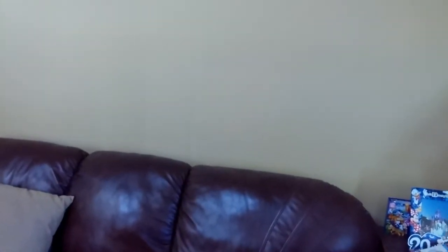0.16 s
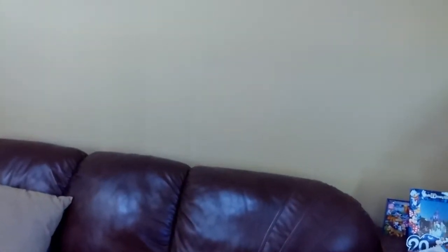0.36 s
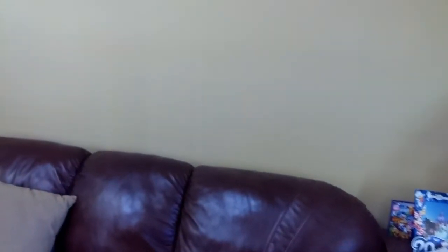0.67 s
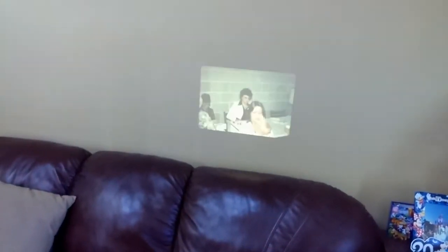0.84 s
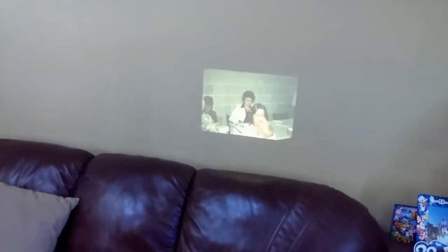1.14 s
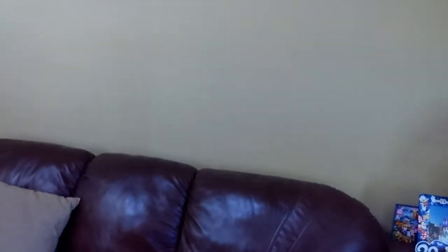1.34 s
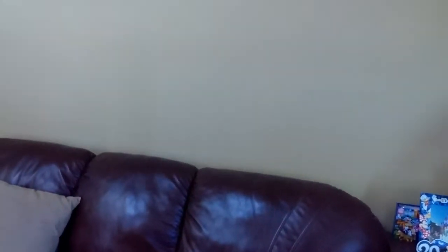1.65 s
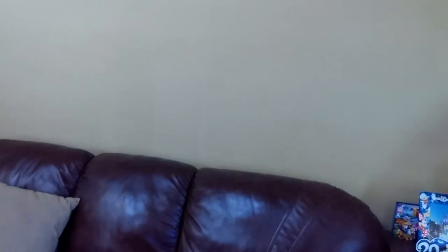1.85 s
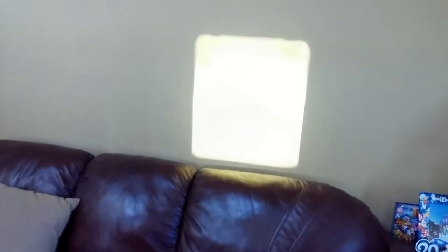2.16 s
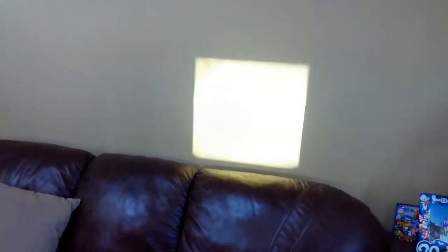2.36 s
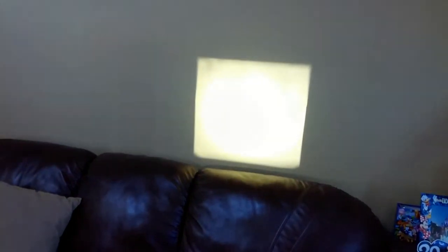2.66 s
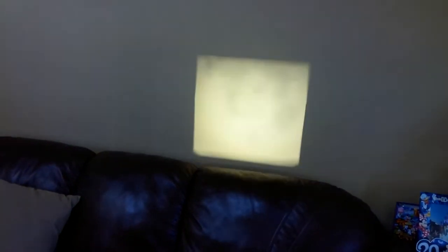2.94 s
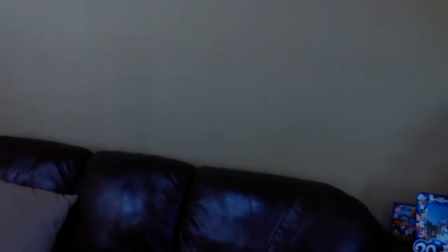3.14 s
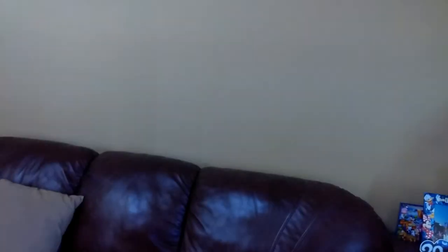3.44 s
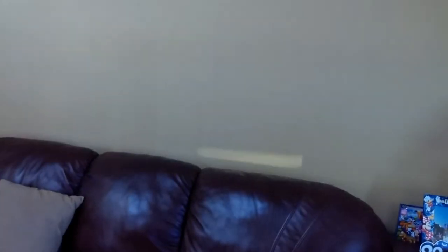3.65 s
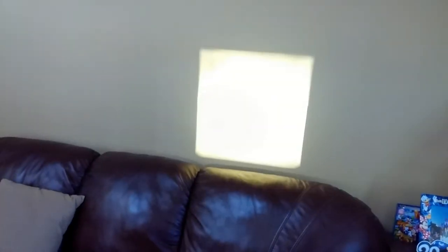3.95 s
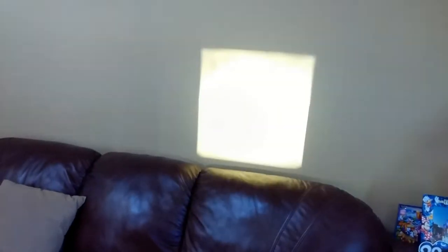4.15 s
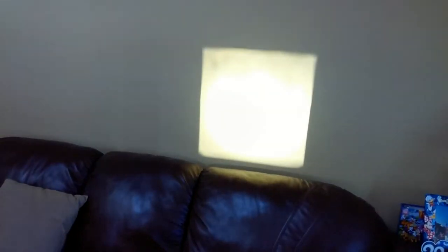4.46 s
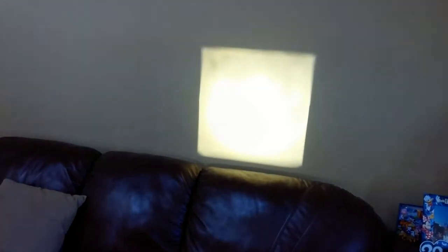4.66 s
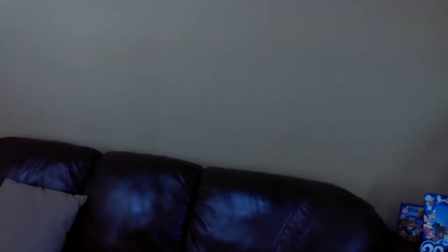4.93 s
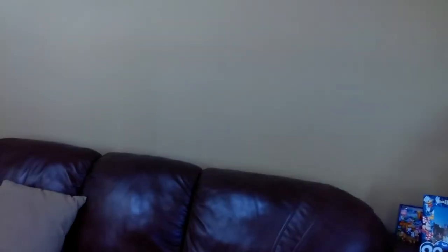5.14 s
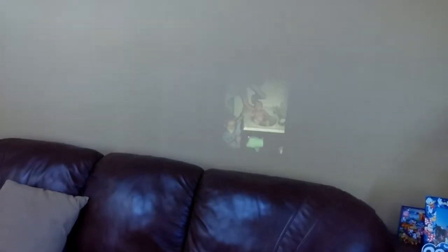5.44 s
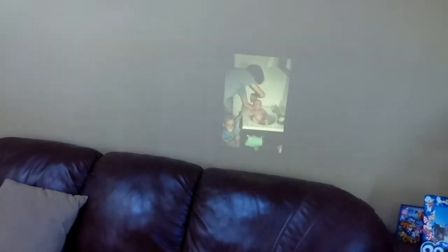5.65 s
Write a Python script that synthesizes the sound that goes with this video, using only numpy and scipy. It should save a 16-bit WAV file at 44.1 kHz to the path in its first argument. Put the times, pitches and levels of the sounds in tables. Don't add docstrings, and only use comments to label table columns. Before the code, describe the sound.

Close, loud mechanical snaps and clatters of a slide changer, four cycles, with fan air, soft buzz and quick faint belt ticking between.

```python
import sys
import numpy as np
from scipy import signal
from scipy.fft import rfft, irfft
from scipy.io import wavfile
from scipy.ndimage import uniform_filter1d

SR = 44100
rng = np.random.default_rng(int(sys.argv[2]) if len(sys.argv) > 2 else 0)


def dump_mix(stems):
    frames = np.atleast_2d(stems).T
    limited = np.clip(frames, -1, 1)
    pcm = np.round(limited * 32767).astype(np.int16)
    wavfile.write(sys.argv[1], SR, pcm)


def gain_from_db(level_db):
    decades = np.asarray(level_db, float) / 20
    return 10 ** decades


N = 255780

# (t/s after the trip, level/dB, struck part f/Hz, contact)
CAM_BLOWS = [(0, 1, 2180, "snap"), (.047, -19, 1580, "scrape"), (.1075, -17.5, 2020, "scrape"),
             (.1235, -17, 1665, "tick"), (.143, -7.5, 1400, "clack"), (.153, -14.5, 1560, "tick"),
             (.304, -23.5, 1380, "scrape"), (.354, -16.5, 1420, "tick"), (.365, -13.5, 1450, "snap"),
             (.611, -22, 2860, "clack"), (.622, -17, 2900, "thunk")]
# (t/s, level/dB, struck part f/Hz, contact)
RISE = [(.051, -28.5, 2900, "snap"), (0.059, -25.5, 2900, "tick"), (0.0654, -2.5, 1830, "snap"),
        (0.077, 6, 2730, "snap"), (.089, -12, 1410, "clack"), (.104, -19, 1660, "snap"),
        (0.1213, -12, 1430, "snap"), (0.228, -20, 1650, "scrape"), (.244, -22, 1790, "snap"),
        (0.256, -19, 2900, "snap"), (0.272, -1, 1930, "snap"), (.284, -5.5, 1604, "clack"),
        (.2947, -15, 1580, "clack"), (.321, -20, 2550, "tick"), (1.357, -28, 2900, "snap"),
        (1.3645, -20.5, 1690, "tick"), (1.3709, 2, 3300, "slam"), (1.379, -3, 1910, "clack"),
        (1.3908, -0.5, 1910, "snap"), (1.3994, -25, 1210, "clack"), (1.4422, -9.5, 1260, "snap"),
        (1.507, -22, 2250, "scrape"), (1.539, -25, 2770, "scrape"), (1.558, -16.5, 2860, "clack"),
        (1.589, -4.5, 1790, "clack"), (1.596, -9, 2150, "scrape"), (1.613, -13, 1570, "tick"),
        (1.6426, -19, 2440, "tick"), (1.672, -23, 2660, "clack"),
        (2.987, -33, 2900, "snap"), (2.9951, -19, 1720, "tick"), (2.9984, -8.5, 1960, "clack"),
              (3.0103, 3.5, 2970, "slam"), (3.0247, -21, 2930, "clack"), (3.047, -21, 1360, "scrape"),
              (3.067, -29, 1280, "scrape"), (3.1728, -17, 1630, "snap"), (3.1852, -24.5, 2920, "tick"),
              (3.218, -20.5, 1460, "thunk"), (3.241, -20, 2000, "thunk"), (3.25, -18, 2550, "tick"),
              (3.2635, -17.5, 2530, "clack"), (3.273, 0, 2800, "snap"), (3.2933, -11.5, 2670, "clack"),
        (4.76, -16.5, 1850, "clack"), (4.767, -5.5, 1780, "clack"), (4.7762, -0.5, 1290, "snap"),
               (4.7832, 1, 1450, "snap"), (4.8, -31, 1480, "clack"), (4.832, -20, 1580, "clack"),
               (4.8471, 0, 2170, "snap"), (4.853, -2, 1820, "snap"), (4.8675, -9, 1340, "clack"),
               (4.948, -24.5, 2800, "scrape"), (4.962, -21, 2940, "clack"), (4.999, -20, 1460, "thunk"),
               (5.0174, -22, 1200, "clack"), (5.027, -18, 2570, "tick"), (5.0392, -22, 2520, "tick"),
               (5.069, -25.5, 2660, "tick")]
# (t/s, level/dB, struck part f/Hz, contact)
DROP = [(.6335, -23, 1480, "thunk"), (0.7624, -6.5, 2300, "clack"), (.7894, -39, 2250, "clack"),
        (.8003, -37, 2260, "clack"), (0.819, -6.5, 2360, "snap"), (0.853, -16.5, 3100, "clack"),
        (0.866, -15.5, 1640, "clack"), (.8752, -31, 1650, "clack"), (2.1305, 1.5, 2610, "slam"),
        (2.1494, -14, 1560, "snap"), (2.167, -6, 1740, "snap"), (2.19, -17.5, 1490, "clack"),
        (3.331, -3.5, 2240, "snap"), (3.343, -25, 1420, "clack"), (3.383, -29, 2170, "clack"),
        (3.7528, 0, 2790, "slam"), (3.769, -11.5, 1370, "clack"), (3.7893, -12.5, 1450, "scrape"),
        (5.406, -17.5, 1760, "tick"), (5.446, -28, 2240, "tick"), (5.4716, -10.5, 1420, "slam"),
        (5.2475, -15, 1200, "clack"), (5.5225, -9, 1620, "clack"), (5.5347, -21, 1870, "clack"),
        (5.5571, -12, 2900, "clack"), (5.566, -5.5, 1900, "snap"), (5.586, -17.5, 1330, "clack")]
CONTACTS = {"snap": (-36.5, -23, 0.028), "clack": (-25, -17, 0.045), "tick": (-28.5, -9.5, 0.031),
            "thunk": (-10.5, -13, 0.016), "scrape": (-43, -25, 0.074), "slam": (-43, -27, 0.035)}
# (t/s after the trip, level/dB)
SLIDING = [
    (-.34, -37),
    (-.28, -30),
    (-.165, -30),
    (-.09, -38.5),
    (.03, -32.5),
    (.16, -32),
    (.3, -34),
    (.55, -33.5),
    (.7, -37),
]
# (f/Hz, level/dB)
CRACK = [(500, -31), (1000, -15), (2000, -16.5), (3200, 1.5), (4200, -4.5), (6000, -0.5), (9000, -1),
         (11000, 1.5), (12000, 2.5), (13500, -1.5), (16000, -3.5)]
# (f/Hz, level/dB, t60/s)
CASE = [(347, -30, 0.02), (441.3, 0, 0.079), (460, 3.5, 0.052), (571, 1, 0.033), (691, 2, 0.062),
        (829.5, 2.5, 0.11)]
# (f/Hz, level/dB, t60/s)
TRAY = [(996.5, -2.5, 0.047), (1200, 3, 0.017), (1400, 0.5, 0.022), (1536, 2.5, 0.03), (1800, 4.5, 0.013),
        (2006, 4, 0.014), (2272, 2, 0.016), (2570, 0, 0.01), (2900, -1.5, 0.029), (2880, -17.5, 0.013)]


def changer():
    contacts = rng.standard_normal(N) * gain_from_db(3.22 * np.minimum(rng.exponential(size=N), 4.5))
    contacts = contacts * gain_from_db(3.1 * walk(700))
    contacts = contacts / contacts.std()
    t = np.arange(SR // 5) / SR
    crack, case, tray, part = np.zeros((4, N))
    blows = every_turn(CAM_BLOWS, column=1) + RISE + DROP
    for s, db, hz, contact in blows:
        case_db, tray_db, length = CONTACTS[contact]
        length = length * gain_from_db(0.18 * (db + 2.0))
        decay = np.exp(-np.log(1000) * (t / max(length, .004)) ** 1.4)
        swarm = (1 - np.exp(-t / 0.0011)) * decay
        add(crack, s, gain_from_db(db - 9.0) * swarm)
        add(case, s, gain_from_db(db + case_db - 22.0) * swarm)
        add(tray, s, gain_from_db(db + tray_db - 22.0) * swarm)
        start = int(s * SR)
        rattle = swarm * np.resize(contacts[start:start + len(t)], len(t))
        add(part, s, ring(gain_from_db(db + tray_db - 16) * rattle, [(hz, 2, .016)]))

    time = np.arange(N) / SR
    after, rub_db = np.transpose(SLIDING)
    rub = sum(np.interp(time, trip + after, gain_from_db(rub_db - 17.5), left=0, right=0) for trip, _, _ in CHANGES)
    rub = rub * gain_from_db(0.85 * walk(55))
    cracks = colour((crack + rub) * contacts, CRACK)
    case_ring = ring((case + gain_from_db(-31.0) * rub) * contacts, CASE)
    tray_ring = ring((tray + gain_from_db(-22.0) * rub) * contacts, TRAY)
    return cracks + case_ring + tray_ring + part


# (t/s, slowness of the cam as a ratio, level/dB)
CHANGES = [
    (.3998, 1.002, 0),
    (1.7073, 1.001, -.5),
    (3.3285, .997, 0),
    (5.1043, .996, -.5),
]


def every_turn(steps, column):
    return [(trip + slow * row[0], *row[1:column], row[column] + db, *row[column + 1:])
            for trip, slow, db in CHANGES for row in steps]


# (t/s after the trip, f/Hz, level/dB, t60/s)
CAM_KNOCKS = [
    (.156, 470, -34, 0.14),
    (.6235, 3150, -24, .018),
    (.6232, 510, -23, 0.065),
]
# (t/s, f/Hz, level/dB, t60/s)
KNOCKS = [(.29, 440, -32.5, 0.32), (.33, 2570, -27, 0.082), (.708, 9660, -35, 0.12),
          (2.014, 9640, -33, 0.073), (3.634, 9700, -34, 0.054), (.757, 1500, -21.5, 0.048),
          (.762, 2272, -9.5, 0.096), (.89, 768, -32.5, 0.18), (.92, 764, -44, 0.18),
          (1.388, 420, -23.5, 0.14), (1.605, 1550, -20.5, 0.098), (2.061, 1530, -18, 0.028),
          (3.002, 1800, -21, 0.046), (3.012, 3160, -19, 0.078), (3.02, 419.4, -30.5, 0.23),
          (3.187, 2930, -36, 0.033), (3.683, 1585, -20.5, .025), (4.16, 1475, -43.5, 0.13),
          (4.2, 1400, -41.5, 0.13), (4.31, 1380, -44.5, .1), (4.57, 1730, -44.5, 0.17),
          (4.791, 414, -38, .12), (5.046, 2550, -26, 0.028), (5.408, 2010, -21, 0.036)]


def knocks():
    out = np.zeros(N)
    for s, hz, db, t60 in every_turn(CAM_KNOCKS, column=2) + KNOCKS:
        push = np.zeros(SR // 4)
        length = int(2 * SR / hz)
        cycles = np.sin(2 * np.pi * hz / SR * np.arange(length))
        add(push, 0, cycles * np.hanning(length) * hz / SR)
        modes = [(hz, 0, t60), (hz * 1.1, -8, t60 * .5), (hz * .9, -9, t60 * .5)]
        add(out, s, gain_from_db(db + 7.5) * ring(push, modes))
    return out


# (t/s, level/dB)
SOLENOID = [
    (0.081, -36),
    (1.384, -30.5),
    (3.013, -40),
    (4.787, -37.5),
]


def solenoid():
    push = np.zeros(N)
    for s, db in SOLENOID:
        add(push, s, gain_from_db(db - 46.5) * np.hanning(SR // 300))
    return ring(push, [(151.5, 9.5, 0.39), (163, 17, 0.053)])


def belt():
    anchor_s, period_s, jitter_s = 2.6265, .0612, .001
    turns = np.arange(-42, 52)
    chance = rng.standard_normal((len(turns), 2))
    times = anchor_s + turns * period_s + jitter_s * chance[:, 0]
    taps = np.zeros(N)
    taps[(times * SR).astype(int)] = gain_from_db(-42.5) * gain_from_db(2.5 * np.clip(chance[:, 1], -2, 1))
    return ring(taps, [(2846, -2.0, 0.042), (2550, -8.5, 0.03), (2930, -28.0, 0.03)])


# (f/Hz, level/dB)
AIR = [(30, 21.5), (90, -6.5), (200, -4), (320, -7), (450, -2), (600, -4.5), (850, 3), (1200, -2.5),
       (2000, -5), (3000, -9.5), (3800, -22.5), (6000, -24.5), (9000, -18), (16000, -21)]


def fan():
    air = colour(rng.standard_normal(N), AIR)
    octaves_hz = 40 * 2. ** np.arange(9)
    air = sum(band(air, hz, hz * 1.13) * gain_from_db(4.9 * walk(5.8)) for hz in octaves_hz)
    flutter = rng.standard_normal(N) * gain_from_db(5.0 * walk(31))
    sung = ring(flutter, [(440, 1.5, 0.14), (782.4, 7, 0.084), (940, -14.5, 0.056), (1400, -26, .1)])
    return gain_from_db(-48.5) * (air / air.std() + gain_from_db(-5) * sung / sung.std())


# (f/Hz, rms level/dB)
HUM = [
    (120, -58),
    (240, -64),
]


def hum():
    t = np.arange(N) / SR
    return sum(gain_from_db(db + 3 + .8 * walk(5)) * np.sin(2 * np.pi * 120 * round(hz / 120) * t) for hz, db in HUM)


# (f/Hz, t60/s, level/dB)
ROOM = [
    (356, 0.47, -9),
    (1400, 0.27, -7),
    (4200, 0.45, -14),
    (11500, 0.16, -7),
]


def room(x, count=6):
    t = np.arange(SR // 2) / SR
    pose = np.repeat(rng.integers(count, size=N // 1000 + 1), 1000)[:N]
    out = 0
    for k in range(count):
        noise = rng.standard_normal((2, len(t)))
        shared = signal.lfilter(*signal.butter(1, 600, fs=SR), noise[0] - noise)
        tail = 0
        for hz, t60, db in ROOM:
            echoes = band(noise + shared, hz, hz * 1.726)
            tail = tail + gain_from_db(db - 28.5) * echoes * np.exp(-np.log(1000) * t / t60)
        tail = tail * (1 - np.exp(-t / 0.00033))
        share = np.sqrt(np.abs(uniform_filter1d(1. * (pose == k), 300)))
        out = out + signal.oaconvolve(x[None] * share, tail, axes=1)[:, :N]
    return out


def colour(x, points):
    hz, db = np.transpose(points)
    grid_hz = np.arange(513) * SR / 1024 + 1
    log_gain = np.interp(np.log(grid_hz), np.log(hz), db) * np.log(10) / 20
    cepstrum = irfft(log_gain)[:513] * np.r_[1, 2 * np.ones(511), 1]
    response = irfft(np.exp(rfft(cepstrum, 1024)))
    return signal.oaconvolve(x, response)[:len(x)]


def ring(x, modes):
    out = 0
    for k, (hz, db, t60) in enumerate(modes):
        r = np.exp(-np.log(1000) / (max(t60, .003) * SR))
        w = 2 * np.pi * hz / SR
        mode = signal.lfilter([np.sin(w)], [1, -2 * r * np.cos(w), r * r], x)
        out = out + (-1) ** k * gain_from_db(db) * mode
    return out


def band(x, hz, width):
    return signal.lfilter(*signal.iirpeak(hz, hz / width, fs=SR), x)


def walk(rate):
    k = int(SR / rate)
    held = np.repeat(rng.standard_normal(N // k + 1), k)
    return uniform_filter1d(uniform_filter1d(held, k), k)[:N]


def add(bus, s, x):
    i = int(s * SR)
    bus[i:i + len(x)] += x[:N - i]


# (f/Hz, level/dB)
SHADOW = [(60, 2), (200, -6.5), (500, 1), (1300, -4), (2400, -2), (4400, 4.5), (6500, 6.5), (10000, 5.5),
          (15000, -4)]


def scene():
    right_lag = 17
    broad = changer() + fan()
    aimed = knocks() + belt()
    near = broad + aimed
    late = np.r_[np.zeros(right_lag), near[:-right_lag]]
    direct = np.array([near, gain_from_db(-7.0) * late])
    walls = room(broad + gain_from_db(-9) * aimed) * gain_from_db(np.array([[-1.5], [1.5]]))
    left, right = direct + walls + hum() + solenoid()
    return np.array([left, gain_from_db(1.77) * colour(right, SHADOW)])


def band_limit(x):
    return signal.sosfilt(signal.butter(12, 16440, fs=SR, output="sos"), x)


# (resonance f/Hz, width f/Hz, lift level/dB, low level/dB, high level/dB)
PORTS = [
    (9490, 853, 15, 3.5, 5.5),
    (8400, 340, 13, -1.5, -6),
]


def record(dry):
    ports = []
    for x, (hz, width, lift_db, low_db, high_db) in zip(dry, PORTS):
        x = x + gain_from_db(lift_db) * band(x, hz, width)
        ports.append(colour(x, [(25, low_db - 38), (100, low_db), (900, low_db),
                                (4200, high_db), (9000, high_db), (16000, high_db)]))
    ports = np.array(ports)
    fall = np.exp(-1 / (.25 * SR))
    loudness = signal.lfilter([1 - fall], [1, -fall], np.abs(ports[0]))
    ports = ports / (1 + 2.96 * loudness)
    clipped = np.clip(1.2 * np.tanh(ports / 1.2), -.8, .8)
    low_hz, top_hz = 35, 15750
    edges = signal.ellip(9, .1, 60, [low_hz, top_hz], "bandpass", fs=SR, output="sos")
    mix = signal.sosfilt(edges, clipped)
    return band_limit(mix)


dry = scene()
out = record(dry)
dump_mix(out)
```